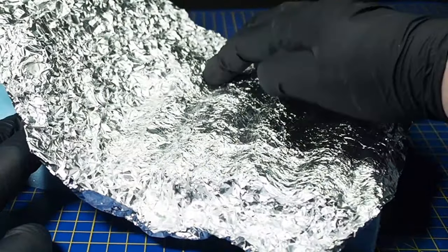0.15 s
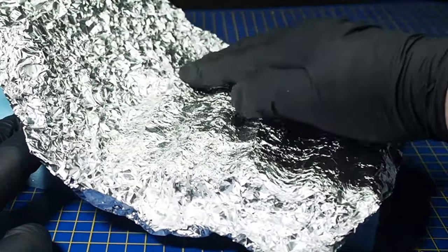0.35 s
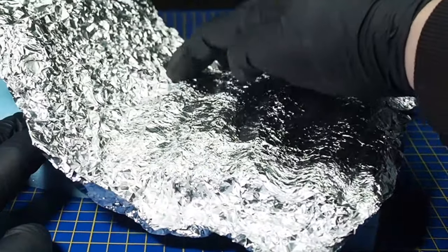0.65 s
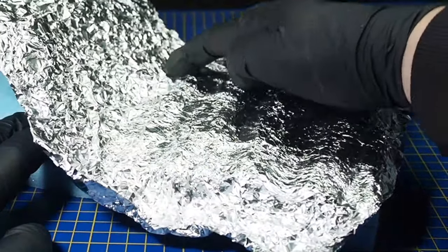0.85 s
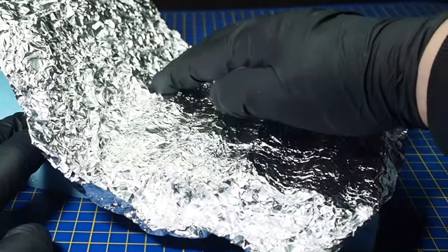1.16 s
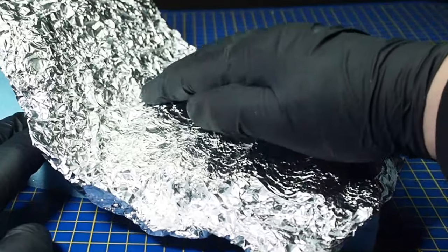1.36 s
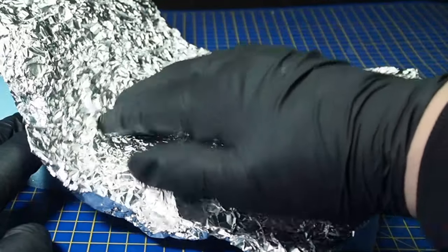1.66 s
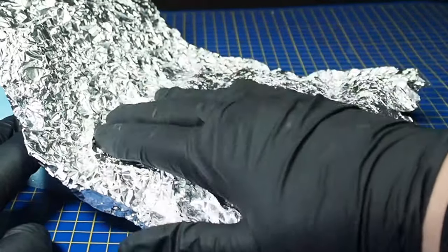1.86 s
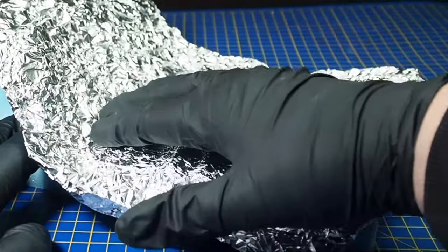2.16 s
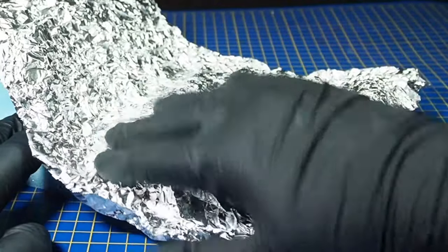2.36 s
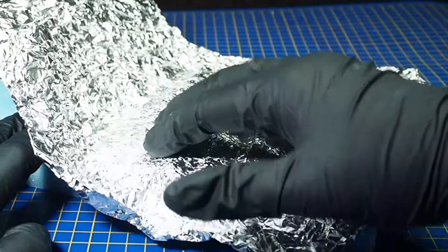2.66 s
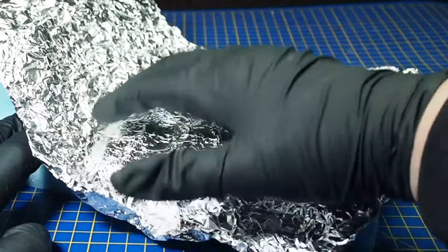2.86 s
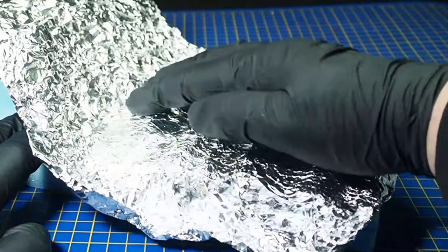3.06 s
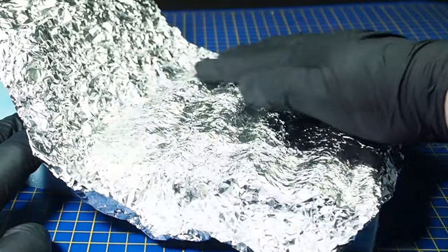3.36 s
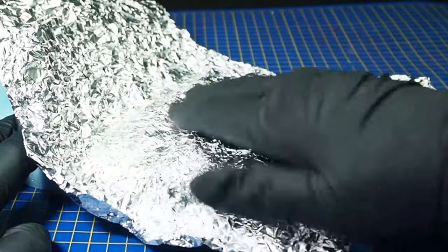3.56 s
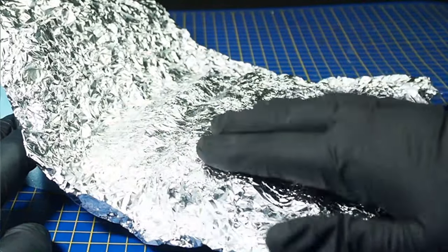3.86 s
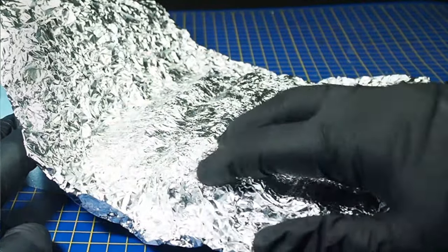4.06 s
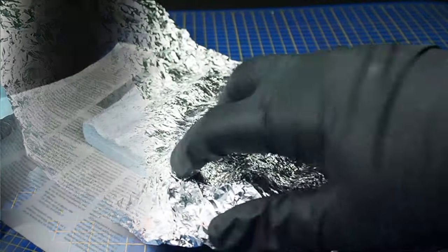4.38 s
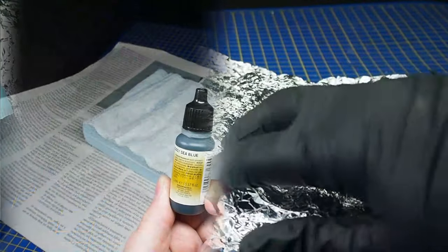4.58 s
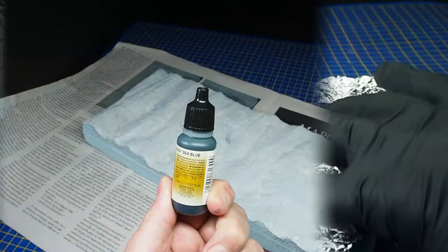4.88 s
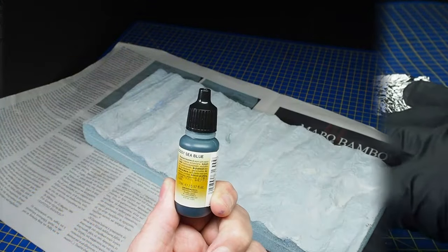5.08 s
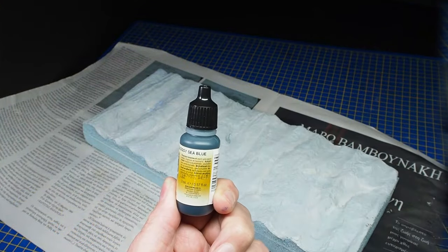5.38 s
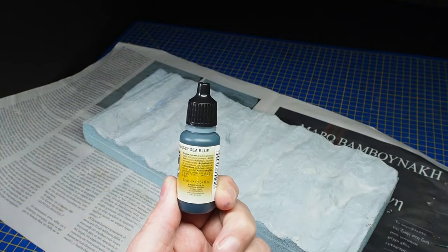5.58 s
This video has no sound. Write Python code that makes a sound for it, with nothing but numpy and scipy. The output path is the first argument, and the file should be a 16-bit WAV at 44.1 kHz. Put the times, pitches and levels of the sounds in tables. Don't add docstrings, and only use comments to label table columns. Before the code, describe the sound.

At a quiet workbench, thin metal foil snaps and rustles under gloved hands, very near the microphone. Quick pats give way to firm presses with a big crackle, then a sparse pause, slower sliding rustles with slightly hollow tones, and weak crinkles that fade out. Low muted knocks sit underneath; the room is dry.

```python
import sys
import numpy as np
from scipy import signal
from scipy.fft import rfft, irfft, next_fast_len
from scipy.io import wavfile
from scipy.ndimage import uniform_filter1d

SR = 44100
rng = np.random.default_rng(int(sys.argv[2]) if len(sys.argv) > 2 else 0)


def generate_wav(signal):
    frames = np.transpose(np.atleast_2d(signal))
    scaled = np.clip(frames, -1, 1) * 32767
    pcm = np.round(scaled).astype(np.int16)
    wavfile.write(sys.argv[1], SR, pcm)


def boost_factor(decibels):
    exponent = np.asarray(decibels, float) / 20
    return 10 ** exponent


N = 252693
SPAN = 8192
LONG = next_fast_len(N + 256)

# peak in seconds, fizz level in dB, fall in ms, body in dB relative to fizz.
PATS = [(0.028, -33.5, 15, 3), (0.129, -20.5, 17, -11), (0.159, -22.5, 6.6, -12), (0.18, -19, 9.8, -18),
        (0.213, -21.5, 4.7, -5.5), (0.28, -24, 4.4, -17), (0.305, -20, 15, -6), (0.401, -21.5, 5.5, -2.5),
        (0.439, -21, 9.3, -1), (0.489, -22, 8.5, -7.5), (0.533, -24, 4.9, -7.5), (0.664, -16.5, 21, -12),
        (0.699, -15.5, 26.3, -12.5), (0.768, -14.5, 8.7, -5), (0.852, -15, 5.9, -4), (0.887, -21, 13, -4),
        (0.935, -24.5, 13, -8), (0.98, -22, 18, -1), (1.015, -17, 12, -13.5), (1.173, -31, 12, -21),
        (1.191, -25, 12, 2), (1.221, -27, 7.4, -36), (1.313, -31, 34, 4)]
# peak in seconds, fizz level in dB, fall in ms, body in dB relative to fizz.
PUSHES = [(1.44, -22.5, 4.8, -5), (1.469, -15.5, 11, -4.5), (1.498, -21, 14, -16.5), (1.553, -21, 9.6, -12),
          (1.584, -13.5, 10.4, -12.5), (1.63, -23, 44, -2), (1.706, -20.5, 4.7, 3.5),
          (1.736, -22.5, 39, -3.5), (1.807, -21.5, 11.4, -5.5), (1.856, -18.5, 14.5, -30.5),
          (1.887, -30, 110, -4), (1.942, -15.5, 20.6, -5.5), (1.995, -18, 15, -5.5),
          (2.024, -18.5, 8.3, 0.5), (2.057, -21.5, 5.3, -0.5), (2.162, -9.5, 18.6, -31),
          (2.215, -23.5, 9.3, 2), (2.348, -24, 7, -4), (2.37, -27.5, 20, 2.5), (2.394, -17.5, 5.1, -16.5),
          (2.454, -21.5, 14, -5), (2.484, -20.5, 7.8, -6.5), (2.532, -33.5, 10, -0.5),
          (2.565, -23.5, 9.9, -7.5), (2.623, -35.5, 4.8, 5), (2.655, -31, 6.8, -2), (2.89, -13.5, 22, -7),
          (3.521, -21, 15, 1.5), (3.865, -17.5, 26, -7.5), (3.884, -19, 32, -5.5)]
# peak in seconds, fizz level in dB, fall in ms, body in dB relative to fizz.
TAPS = [(2.74, -30, 3.9, 1), (2.775, -34, 16, 4), (2.83, -28.5, 6.8, 4), (2.955, -27.5, 8.3, -2),
        (2.993, -22.5, 5.4, -11), (3.033, -28, 20, 0), (3.073, -28, 6.3, 1), (3.126, -29.5, 5.4, 2.5),
        (3.152, -30, 9.6, -1), (4.048, -31.5, 13, 0), (4.079, -29, 15.5, -1.5), (4.133, -31, 11.5, -6),
        (4.169, -31.5, 7.4, 3.5), (4.215, -51.5, 12, 14), (4.288, -31.5, 8.6, 3), (4.315, -39, 11, 6.5),
        (4.455, -24.5, 7.4, -8.5), (4.477, -36.5, 7, -2), (4.508, -50.5, 8.7, 14.5),
        (4.686, -31.5, 8.4, -9), (4.713, -40, 15, -0.5), (4.797, -30.5, 7.2, -10), (4.921, -43.5, 11, -2.5),
        (4.961, -46, 3.8, -8), (5.085, -39, 11, 2.5), (5.197, -58.5, 23, -5.5), (5.24, -52.5, 22, 1),
        (5.333, -59, 4, 5.5), (5.36, -57, 5.7, 7), (5.436, -62, 15.6, 5), (5.575, -75.5, 7.2, 12.5)]
# peak in seconds, fizz level in dB, fall in ms, body in dB relative to fizz, rise in ms.
STROKES = [(0.066, -20.5, 21, -13.5, 15), (0.342, -16.5, 13, -9, 15), (0.575, -21, 21, -12, 30),
           (0.633, -24.5, 12.5, -31, 23), (0.824, -23, 10.4, -10, 25), (1.094, -21.5, 10, -6, 17),
           (1.283, -21.5, 13.4, -4.5, 17), (1.668, -22, 9.8, -11.5, 22), (2.12, -13.5, 17.5, -11, 19.6),
           (2.245, -25.5, 17, -22.5, 92), (2.311, -23, 10, 0.5, 18.6), (3.22, -22, 14, 1, 26),
           (3.29, -27.5, 7.2, -9.5, 29), (3.343, -21, 22, 1.5, 20), (3.43, -17.5, 43, -2.5, 49),
           (3.462, -14, 5.6, -6.5, 12), (3.592, -23.5, 11, 3.5, 50), (3.663, -20.5, 23.5, -1, 270),
           (3.746, -24.5, 13, 2.5, 19), (3.787, -16.5, 27, -4.5, 39), (3.955, -34, 15.4, 4.5, 49),
           (4.258, -30, 10, -4, 15.5), (4.579, -36.5, 13.5, -6.5, 34), (4.872, -41.5, 19, -4.5, 59)]


def presses():
    full_fall_ms, rise_follows = 10.7, 0.076
    rows = []
    for gesture, rise_ms in ((PATS, 7.1), (PUSHES, 9.2), (TAPS, 7.4)):
        for row in gesture:
            shortening = min(row[2] / full_fall_ms, 1) ** rise_follows
            rows.append((*row, rise_ms * shortening))
    rows.extend(STROKES)
    return np.transpose(rows)[:, :, None, None]


# frequency in Hz, density in dB per Hz.
FIZZ = [(1290, -13), (2200, -5.5), (2450, -8), (3630, 0), (4830, -3), (5500, -1.5), (6220, -4.5),
        (7570, -0.5), (12300, -4), (13900, -2), (15600, -5)]
# frequency in Hz, density in dB per Hz.
BODY = [(350, -38.5), (600, -16.5), (728, 4), (901, -2), (992, 2.5), (1200, -3.5), (1650, -3.5), (1890, -6),
        (2120, -5.5), (2800, -6.5), (3640, -8.5), (6160, -120)]
# peak in seconds, level in dB, frequency in Hz.
RINGS = [(0.85, -30.5, 785), (1.284, -31, 825), (1.467, -27, 742), (2.105, -28, 814), (2.393, -29, 1130),
         (2.892, -29, 1380), (3.033, -31, 721), (3.216, -33, 699), (3.222, -23.5, 985), (3.466, -23.5, 785),
         (3.79, -26, 740), (3.519, -31.5, 721), (3.59, -22.5, 1090), (3.663, -29, 710),
         (0.345, -34.5, 1033), (4.079, -36.5, 950), (4.291, -47, 900), (4.506, -41, 990),
         (0.403, -38, 1094), (4.798, -48, 990), (4.872, -50, 1030), (5.088, -49.5, 715)]


def creases():
    s, fizz_db, fall, body_db, rise = presses()
    shape = (len(s), 2, SPAN)
    bright_db = -2.5 * np.log2((rise + fall) / 6.8) - 0.22 * body_db
    top = np.clip(np.log2(np.fft.rfftfreq(SPAN, 1 / SR) / 7000 + 1e-9), 0, 1)
    few = np.minimum(1, 17 / (rise + fall))
    tone_db = bright_db * top + few * facets(len(s), 2500, 15000, count=24, width=0.0027, boost_db=17.0)
    shade_db = facets(len(s), 2500, 15000, count=3, width=0.13, boost_db=3.5)
    fizz = coloured(snaps(shape, 1.6, grain=16), FIZZ, tone_db - shade_db)
    body_tone_db = few * facets(len(s), 650, 2500, count=6, width=0.028, boost_db=12.5)
    body = coloured(snaps(shape, 3.2, grain=40), BODY, body_tone_db)
    body = body + boost_factor(-13.0) * coloured(rng.standard_normal(shape), FOAM)
    swell = hump(0.81 * rise, 0.89 * fall, edge=1.98, tail=1.7)
    crisp = hump(0.79 * rise, 0.86 * fall, edge=2.1, tail=1.96)
    bright = crisp * boost_factor(fizz_db - 1.14) * fizz
    full = swell * boost_factor(fizz_db + body_db - 4.5) * body
    swarms = np.pad(placed(s.ravel(), bright + full), ((0, 0), (0, 256)))
    lead_ms = 0.5 * rng.standard_normal(len(RINGS))
    return patchy(swarms, 0.17, 0.24) + swings(RINGS, 6.1, 4.0, lead_ms, gain_db=7.0)


# start in seconds, peak level in dB, centre frequency in Hz.
POPS = [(0.026, -21, 7770), (0.052, -21, 7450), (0.055, -12.5, 8050), (0.1238, -13, 3940),
        (0.3, -16.5, 7540), (0.33, -14.5, 8500), (0.4364, -13, 7700), (0.4838, -15.5, 10600),
        (0.531, -5, 13800), (0.5706, -6.5, 3800), (0.6585, -11, 7450), (0.6935, -14, 7570),
        (0.761, -9, 14000), (0.8165, -10, 14000), (0.8477, -12, 4500), (0.97, -12, 3620),
        (1.0103, -11.5, 13600), (1.0914, -9, 9100), (1.0922, -15.5, 9100), (1.2703, -12.5, 5130),
        (1.4335, -12, 7550), (1.466, -15, 4370), (1.549, -16.5, 14300), (1.5783, -9.5, 7400),
        (1.701, -8.5, 9600), (1.734, -9.5, 8100), (1.8004, -9.5, 8000), (1.847, -7.5, 8700),
        (1.936, -12, 5110), (2.0547, -12.5, 8450), (2.1073, -6.5, 4190), (2.1557, -1.5, 5540),
        (2.2106, -8.5, 13500), (2.345, -14, 7940), (2.392, -14.5, 8170), (2.4483, -14, 3260),
        (2.4792, -11.5, 6740), (2.5616, -17.5, 4100), (2.7357, -25, 3440), (2.773, -24, 3670),
        (2.826, -17.5, 8940), (2.885, -13, 13700), (2.8842, -6.5, 7810), (2.9896, -20, 3630),
        (3.029, -20, 3560), (3.32, -12.5, 3370), (3.455, -6.5, 3080), (3.7338, -17.5, 3690),
        (3.856, -16.5, 7530), (4.0721, -19, 3640), (4.127, -30, 3560), (4.167, -24.5, 4530),
        (4.2468, -20, 4050), (4.2545, -20.5, 5630), (4.2534, -17, 3940), (4.4385, -25, 14300),
        (4.4512, -18, 13400), (4.6823, -21.5, 9000), (4.7955, -31.5, 8800), (5.08, -24.5, 7260)]
# start in seconds, peak level in dB, frequency in Hz.
PANELS = [(0.0238, -28, 1270), (0.1266, -21.5, 1990), (0.2998, -25, 1820), (0.3965, -28, 1660),
          (0.4359, -28, 1310), (0.4888, -28, 1500), (0.5746, -19, 2910), (0.662, -18, 2710),
          (0.6923, -18, 1820), (0.7642, -16.5, 2120), (0.8495, -35, 2120), (0.9762, -19, 2274),
          (1.4366, -27, 2150), (1.462, -16.5, 1536), (1.6262, -34, 2600), (1.7028, -20.5, 1557),
          (1.8846, -27, 1470), (1.937, -16, 1476), (2.0177, -19, 1340), (2.0552, -21, 1460),
          (2.107, -15, 3050), (2.214, -31, 1260), (2.3017, -13.5, 2070), (2.7377, -26, 2030),
          (2.8838, -18, 1330), (3.0295, -27, 1400), (3.1264, -27, 1610), (3.1906, -20.5, 1260),
          (3.213, -16, 1190), (3.3228, -27, 1498), (3.3982, -22, 2090), (3.5165, -18, 1694),
          (3.5852, -14, 1662), (3.6174, -14, 1530), (3.728, -27, 1720), (3.7748, -20, 1540),
          (3.8615, -21, 1650), (3.8746, -17, 1623), (4.0422, -27.5, 2920), (4.2505, -20.5, 2100)]


def pops():
    s, db, centre_hz = np.transpose(POPS)[:, :, None, None]
    size = SPAN // 8
    hz = np.fft.rfftfreq(size, 1 / SR)
    tint_db = 15.0 * np.exp(-(np.log((hz + 1) / centre_hz) / 0.24) ** 2)
    crack = coloured(snaps((len(s), 2, size), 2.8, grain=12), FIZZ, tint_db)
    swell = hump(2.5, 3.6, edge=4.2, tail=0.56)[..., (SPAN - size) // 2:][..., :size]
    cracks = placed(s.ravel() + 0.0035, boost_factor(db - 12) * swell * crack)
    rings = np.add(PANELS, [0.00498, 0, 0])
    return cracks + swings(rings, 0.76, 4.5, rng.standard_normal(len(rings)), gain_db=-3.5)


# peak in seconds, fizz level in dB, body in dB relative to fizz.
FLICKERS = [(0.389, -31, -22), (0.72, -29, 2), (0.876, -21, -18), (0.91, -25.5, -10), (0.957, -35, -3),
            (1.06, -27, -3), (1.162, -32.5, -9), (1.241, -44, 7), (1.31, -23.5, -14), (1.367, -28, -5),
            (1.394, -32, -2), (1.514, -37.5, 12.5), (1.828, -27.5, -20), (1.885, -22.5, -11),
            (1.911, -34, 2), (2.07, -23, -18), (2.429, -28, -13), (2.509, -33, -7), (2.612, -46, -2),
            (2.671, -50, -7), (2.692, -48, 4), (2.795, -41.5, 11), (2.98, -38, 3), (3.11, -30.5, -1),
            (3.816, -36.5, 7), (4.118, -56, 16), (4.391, -58, 4), (4.435, -40.5, -4), (4.487, -48.5, 6),
            (4.54, -46, 9), (4.629, -48.5, -13), (4.67, -43.5, -13), (4.94, -62, -4), (5.02, -49, -6),
            (5.041, -49.5, -7), (5.114, -53, 0), (5.415, -63.5, -4), (5.52, -72, 5.5)]
# peak in seconds, level in dB, frequency in Hz.
HOLLOW = [
    (3.28, -37, 720),
    (3.41, -32.5, 799),
    (3.435, -35.5, 780),
    (3.43, -29.5, 2100),
    (3.545, -32.5, 2100),
    (3.565, -34, 730),
    (3.645, -34.5, 731),
    (3.735, -34.5, 750),
    (3.815, -40, 760),
    (3.92, -36.5, 1002),
]


def flickers():
    s, fizz_db, body_db = np.transpose(FLICKERS)[:, :, None, None]
    size = SPAN // 4
    fizz, body = (coloured(snaps((len(s), 2, size), 0.75, grain=16), shape) for shape in (FIZZ, BODY))
    swell = hump(4.8, 7.0, edge=1.5, tail=1.4)[..., (SPAN - size) // 2:][..., :size]
    crinkles = placed(s.ravel(), swell * boost_factor(fizz_db - 3.0) * (fizz + boost_factor(body_db) * body))
    return crinkles + swings(HOLLOW, 16.0, 11.0, rng.standard_normal(len(HOLLOW)), gain_db=4.5)


# time in seconds, fizz level in dB.
RUSTLE = [(0.0, -61.5), (0.2, -33), (0.73, -36.5), (0.95, -32.5), (1.14, -37), (1.5, -31.5), (2.12, -33.5),
          (2.6, -45.5), (2.86, -47), (3.2, -39), (3.601, -30), (4.02, -51.5), (4.39, -53), (4.76, -56.5),
          (5.022, -61.5), (5.15, -72), (5.42, -76.5), (5.6, -99)]
LIFTS = [0.19, 0.252, 0.472, 0.504, 0.92, 1.132, 1.33, 1.428, 1.526, 2.046, 2.337, 2.554, 2.726, 2.766,
         3.022, 3.094, 4.093, 4.145, 4.42, 4.525, 4.762, 4.991]
# frequency in Hz, density in dB per Hz.
RUMBLE = [(12, -23), (20, -1.5), (48, -4.5), (103, -5), (161, -6), (230, -11), (300, -32), (510, -120)]


def rustle():
    t = np.arange(N) / SR
    s, effort_db = np.transpose(RUSTLE)
    fizz_db = np.interp(t, s, effort_db)
    body_db = 0.85 * fizz_db - 12.5 + 3 * np.clip(t - 2.3 + .5, 0, 1)
    fade_s, fade_long_s, fade_power = 3.86, 2.17, 2.77
    rumble_db = -47.5 + fade_power * 20 * np.log10(np.clip(1 - (t - fade_s) / fade_long_s, 1e-3, 1))

    def level(db):
        return boost_factor(db) * (t < s[-1])

    dull_db = -3 * np.log2(np.clip(np.fft.rfftfreq(LONG, 1 / SR) / 7000, 1, 2))
    fizz = coloured(snaps((2, LONG), 1.3, grain=20), FIZZ, dull_db)
    body = coloured(snaps((2, LONG), 1.1, grain=60), BODY)
    foam, rumble = (patchy(coloured(rng.standard_normal((2, LONG)), shape), 1.8, 1.526)
                    for shape in (FOAM, RUMBLE))
    sheet = level(fizz_db) * patchy(fizz, 2.8, 2.8) + level(body_db) * patchy(body, 3.6, 0.81)
    lift_s = 0.0093
    lifted = np.exp(-((t[::64, None] - LIFTS) / lift_s) ** 2).sum(axis=1).repeat(64)[:N]
    below = level(body_db - 7.0) * foam + level(rumble_db) * np.clip(t / 0.095, 0, 1) * rumble
    return sheet * boost_factor(-5 * lifted) + below


# frequency in Hz, density in dB per Hz.
FOAM = [(120, -36.5), (200, -22), (295, 0), (409, -1), (478, 2.5), (598, -6), (640, -20.5), (830, -40.5),
        (1410, -120)]
# peak in seconds, level in dB, frequency in Hz.
KNOCKS = [(0.027, -38, 482), (0.125, -34, 368.3), (0.21, -42, 427), (0.306, -39, 417), (0.49, -38.5, 293.6),
          (0.767, -37.5, 368.6), (0.852, -27.5, 292.2), (1.102, -41, 497), (1.195, -35.5, 416),
          (1.284, -41.5, 451), (1.467, -30, 489), (1.766, -37.5, 483.7), (1.947, -38, 543),
          (2.027, -33, 540), (2.106, -38.5, 390), (2.218, -44, 384), (2.058, -41.5, 339), (2.889, -36, 360),
          (2.954, -40, 481), (3.032, -36.5, 455), (3.109, -41, 459), (3.411, -33.5, 378),
          (3.59, -40.5, 462), (3.811, -38, 360.6), (4.083, -34, 394), (4.715, -56, 306), (5.087, -60, 470),
          (5.33, -62, 423), (5.524, -75.5, 449), (5.576, -74, 358)]
# peak in seconds, level in dB, frequency in Hz.
NUDGES = [
    (2.53, -44, 158.4),
    (2.79, -40, 190.7),
    (3.109, -42.5, 149),
    (3.234, -40, 126),
    (3.567, -35.5, 143),
    (4.09, -41.5, 168),
]


def block():
    s, db, _ = np.transpose(KNOCKS)
    puff = coloured(rng.standard_normal((len(s), 2, SPAN)), FOAM) * hump(5.9, 9.5)
    puffs = placed(s, puff * boost_factor(db - 0.2)[:, None, None])
    knocks = swings(KNOCKS, 6.6, 5.1, 0.53 * rng.standard_normal(len(s)), gain_db=6.0)
    rocking = swings(NUDGES, 12.0, 6.2, rng.standard_normal(len(NUDGES)), gain_db=1.0)
    return puffs + knocks + rocking


# peak in seconds, level in dB, lead of the left port in ms.
THUMPS = [(0.131, -29, -4.5), (0.223, -32, 1.5), (0.315, -27.5, -3), (0.41, -39, 5), (0.502, -30.5, -2),
          (0.584, -39, -3.5), (0.674, -37, 9), (0.773, -24.5, 1), (0.863, -20, 2.5), (0.943, -28, 2.5),
          (1.027, -30, 3), (1.201, -27.5, -1.5), (1.293, -32, -1.5), (1.384, -34, 1.5), (1.656, -41, 1.5),
          (2.281, -41, -3), (2.36, -42, 3), (2.789, -30, 6.5), (2.891, -27.5, -4), (2.96, -36, -2.5),
          (3.107, -40, -1.5), (4.088, -32, 3), (4.184, -35, 6)]


def bench():
    s, db, lead_ms = np.transpose(THUMPS)
    hz = 99.2 * (1 + 0.019 * rng.standard_normal(len(s)))
    main = swings(np.transpose([s, db, hz]), 9.5, 7.0, lead_ms, gain_db=1.0)
    overtone = swings(np.transpose([s, db, 1.9 * hz]), 7.2, 0.94, lead_ms, gain_db=-6.5)
    return main + overtone


# frequency in Hz, density in dB per Hz.
HUM = [(20, -9), (28, -5), (48, -24), (62, -13.5), (105, -6), (150, -29), (740, -41), (1700, -48),
       (15700, -52)]


def room():
    start = round(5.616 * SR)
    hum = coloured(rng.standard_normal(N - start), HUM)
    return np.pad(boost_factor(-60.0) * hum, (start, 0))


def swings(rows, rise_ms, fall_ms, lead_ms, gain_db):
    s, db, hz = np.transpose(rows)[:3, :, None, None]
    delay = np.reshape(lead_ms, (-1, 1, 1)) / 2000 * np.array([[1], [-1]])
    t = np.arange(SPAN) / SR + delay
    swing = np.sin(2 * np.pi * (hz * t + rng.random(s.shape)))
    return placed(s.ravel(), swing * hump(rise_ms, fall_ms) * boost_factor(db + gain_db))


def snaps(shape, spread_db, grain):
    shared = rng.standard_normal(shape).sum(axis=-2, keepdims=True)
    size = uniform_filter1d(shared, grain, axis=-1)
    return rng.standard_normal(shape) * boost_factor(spread_db * unit(size))


def facets(events, lo_hz, hi_hz, count, width, boost_db):
    hz = np.fft.rfftfreq(SPAN, 1 / SR)
    centre = lo_hz * (hi_hz / lo_hz) ** rng.random((events, count, 1))
    distance = np.abs(np.log(hz + 1) - np.log(centre)).min(axis=1)
    return boost_db * np.exp(-(distance / width) ** 2)[:, None]


def patchy(x, depth_db, beat_db):
    z = signal.stft(x, nperseg=256)[2]
    field = uniform_filter1d(rng.standard_normal(z.shape[1:]), 5, axis=0)
    field = uniform_filter1d(field, 6, axis=1)
    flurry = unit(uniform_filter1d(rng.standard_normal(z.shape[2]), 3))
    gain = boost_factor(depth_db * field / field.std() + beat_db * flurry)
    return signal.istft(z * gain, nperseg=256)[1][:, :N]


def hump(rise_ms, fall_ms, edge=5.5, tail=1.02):
    ms = np.arange(SPAN // 2) / SR * 1000
    rise = (ms[::-1] / np.reshape(rise_ms, (-1, 1))) ** edge
    fall = (ms / np.reshape(fall_ms, (-1, 1))) ** tail
    rise, fall = np.broadcast_arrays(rise, fall)
    return np.exp(-np.concatenate([rise, fall], axis=1) / 2)[:, None]


def placed(times, bursts):
    out = np.zeros((2, N + 2 * SPAN))
    for s, burst in zip(times, bursts):
        start = round(s * SR) + SPAN - burst.shape[-1] // 2
        out[:, start:][:, :burst.shape[-1]] += burst
    return out[:, SPAN:][:, :N]


def coloured(x, spectrum, extra_db=0):
    hz = np.fft.rfftfreq(x.shape[-1], 1 / SR)
    inside = (hz > spectrum[0][0]) & (hz < spectrum[-1][0])
    gain = inside * boost_factor(along(spectrum, hz) + extra_db)
    return unit(irfft(rfft(x) * gain, x.shape[-1]))


def along(points, hz):
    f, v = np.transpose(points)
    return np.interp(np.log(hz + 1), np.log(f + 1), v)


def unit(x):
    return x / np.sqrt(np.mean(x ** 2, axis=-1, keepdims=True) + 1e-20)


# frequency in Hz, left minus right in dB.
PORTS = [(300, 0.3), (2400, 1), (5000, 2), (9000, 5.5), (13500, -5.5)]


def scene():
    hz = np.fft.rfftfreq(LONG, 1 / SR)
    ports = boost_factor(np.outer([.5, -.5], along(PORTS, hz)))
    sheet = creases() + pops() + flickers() + rustle()
    below = block() + bench() + room()
    return irfft(rfft(sheet, LONG) * ports, LONG)[:, :N] + below


# centre in Hz, half width in Hz, share of time as a fraction.
GAPS = [(2650, 700, .09), (5500, 1300, .09), (11500, 1400, .11)]


def starved(x):
    hz, t, z = signal.stft(x, SR, nperseg=1024, noverlap=768)
    share = sum(part * (np.abs(hz - centre_hz) < width_hz) for centre_hz, width_hz, part in GAPS)
    hungry = 4.5 * uniform_filter1d(rng.random(z.shape[2]) < .2, 9, output=float)
    cells = rng.random((len(hz) // 8 + 1, z.shape[2] // 5 + 1))
    cells = cells.repeat(8, axis=0).repeat(5, axis=1)[:len(hz), :z.shape[2]]
    kept = cells > share[:, None] * hungry * (t < RUSTLE[-1][0])
    limited = z * kept * (hz < 15750)[:, None]
    return signal.istft(limited, SR, nperseg=1024, noverlap=768)[1][:, :N]


def top_cut(x):
    return signal.sosfilt(signal.butter(12, 15720, fs=SR, output="sos"), x)


def record(dry):
    mix = np.clip(starved(dry), -1, 1)
    return top_cut(mix)


dry = scene()
out = record(dry)
generate_wav(out)
```